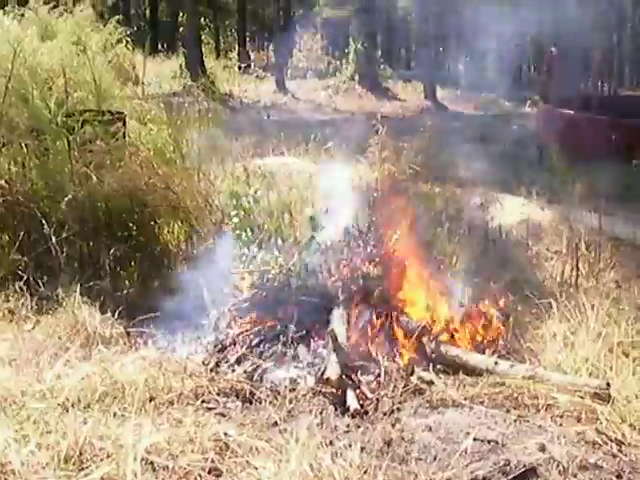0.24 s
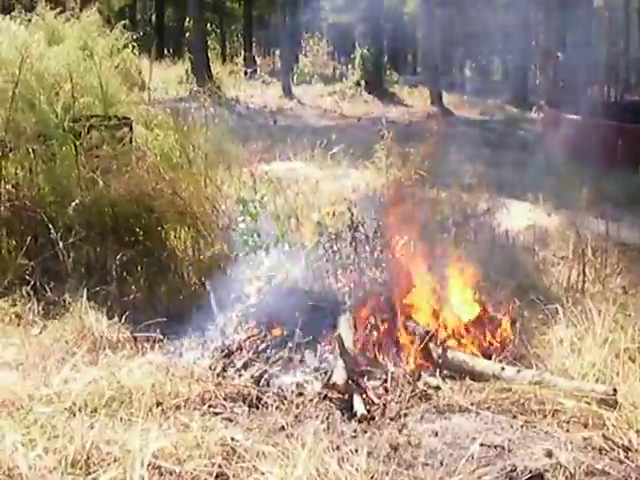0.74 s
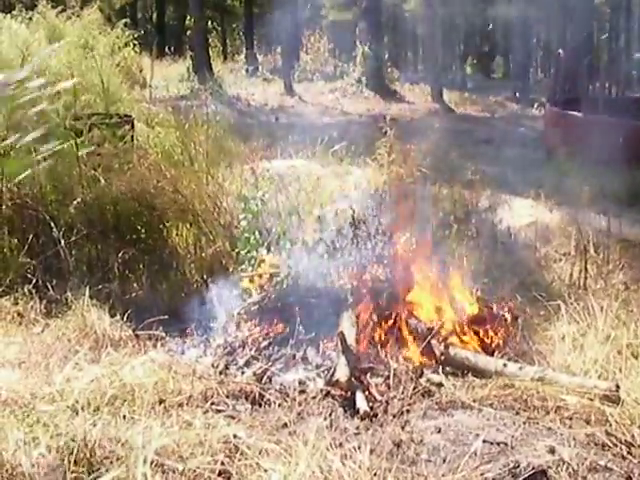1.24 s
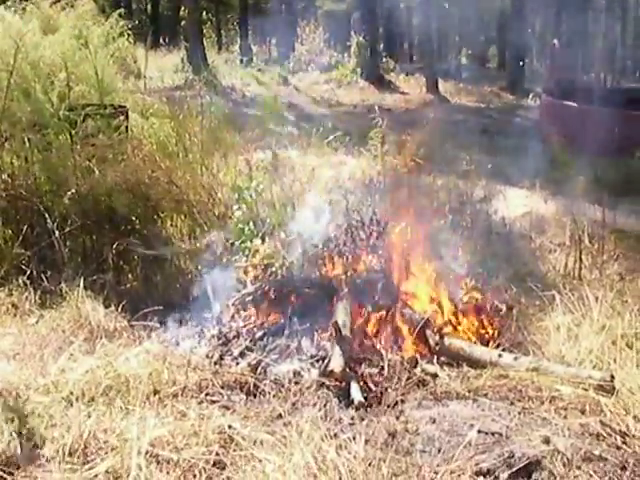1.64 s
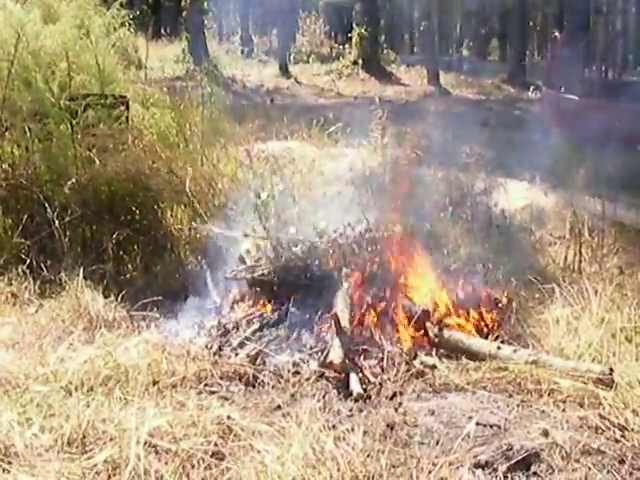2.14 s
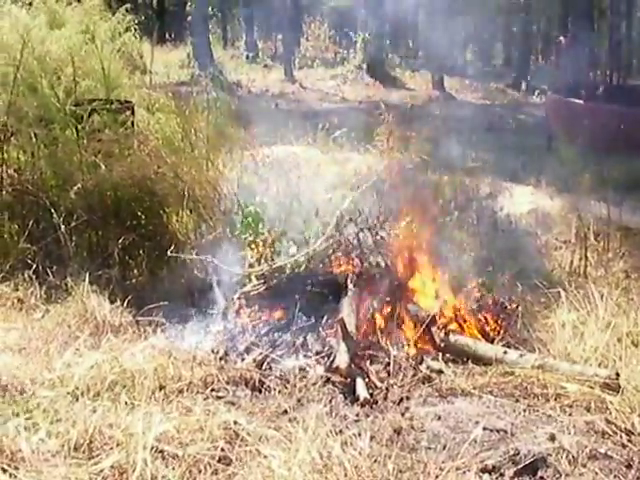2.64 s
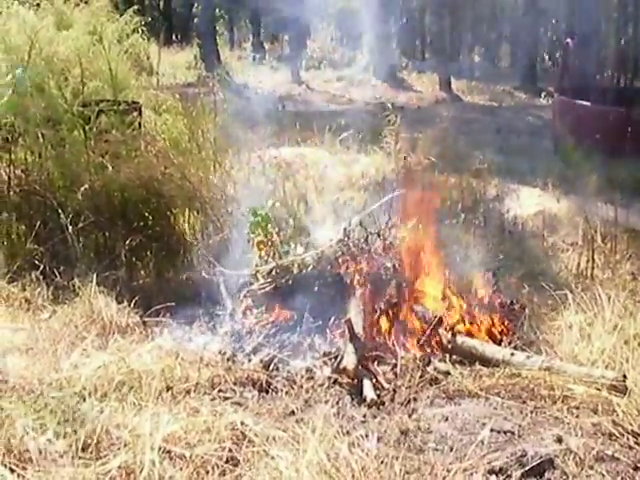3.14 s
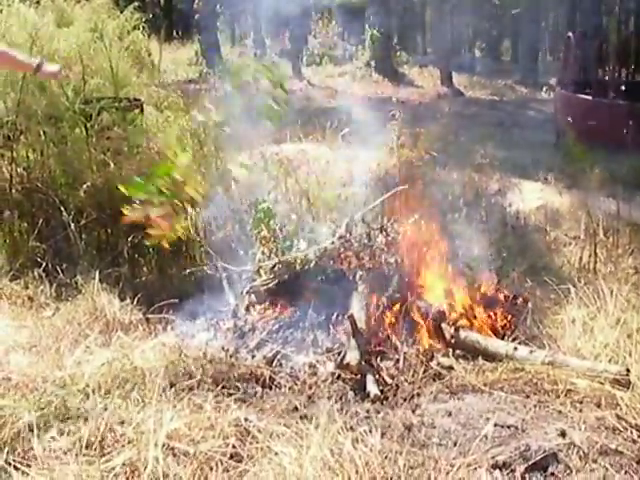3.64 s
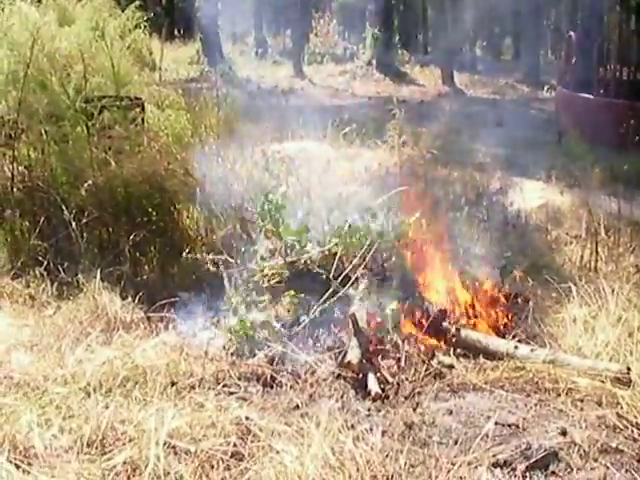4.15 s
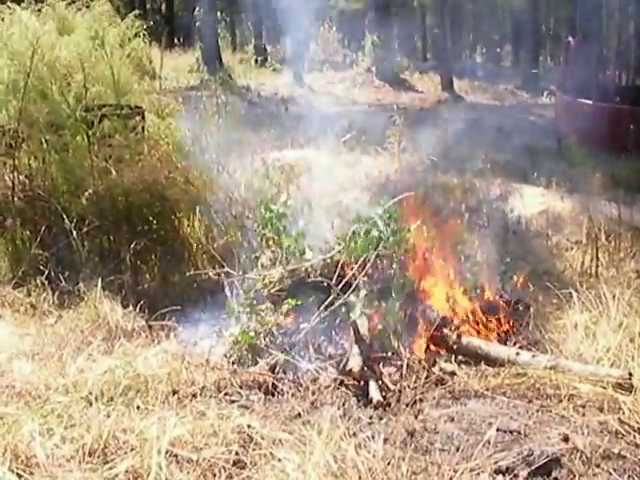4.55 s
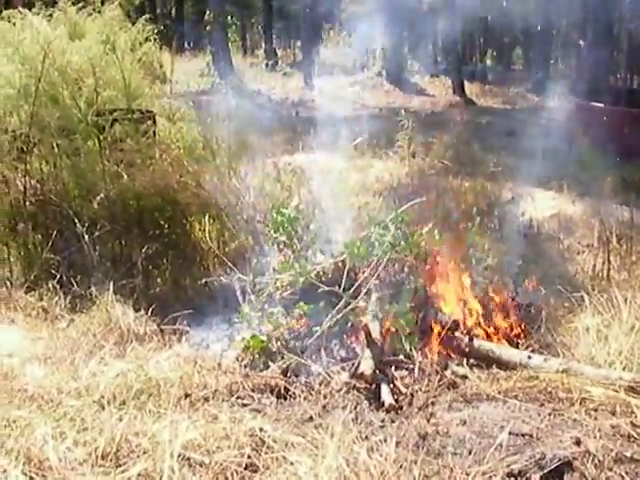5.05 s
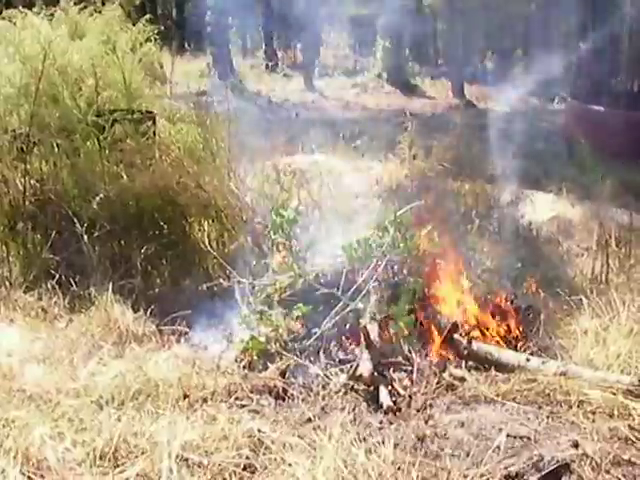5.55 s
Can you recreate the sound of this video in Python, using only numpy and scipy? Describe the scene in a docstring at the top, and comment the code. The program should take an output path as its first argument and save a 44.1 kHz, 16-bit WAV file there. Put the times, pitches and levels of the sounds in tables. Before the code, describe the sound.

A small fire of straw and twigs crackles densely outdoors, with sharp pops, hissing steam and a low rumble.

```python
"""Burning pine straw and twigs

A pile burns outdoors, a few steps away. Pockets of sap burst as short pops, over the crackle of
snapping needles and a hiss of steam that come in spurts. The flames rumble as they draw air, gas
gives soft thumps, and a light breeze pushes on the microphone. Two leafy branches land with a swish."""
import sys
import numpy as np
from scipy import signal
from scipy.fft import rfft, irfft, next_fast_len
from scipy.io import wavfile
from scipy.ndimage import uniform_filter1d, minimum_filter1d, map_coordinates

SR = 44100
rng = np.random.default_rng(int(sys.argv[2]) if len(sys.argv) > 2 else 0)


def put_to_file(sound):
    """Save the sound as 16-bit audio at rate SR, in the file named by the first command-line argument."""
    columns = np.atleast_2d(sound).T  # one column per channel
    safe = np.clip(columns, -1, 1)
    whole_steps = np.round(safe * 32767)
    wavfile.write(sys.argv[1], SR, whole_steps.astype(np.int16))


N = 255780

# Bursting sap pockets; levels in all tables are relative:
# (time [s], low thud [dB], ringing body [dB], bright spit [dB], body pitch [Hz])
SAP_POPS = [(0.0071, -33, -17, -11.5, 3260), (0.0287, -24.5, -16, -34, 4550),
            (0.0827, -24.5, -18, -10.5, 5140), (0.1198, -44, -22, -18, 4400), (0.133, -44, -12, -19, 4500),
            (0.153, -16.5, -8, -40, 3080), (0.2133, -47, -39, -18, 5200), (0.2356, -30, -28, -14, 3800),
            (0.273, -32, -25, -10.5, 3960), (0.2988, -41, -20, -24, 3970), (0.3052, -17.5, -7.5, -25, 4100),
            (0.414, -48, -22, -38, 6300), (0.4265, -26, -17, -16.5, 6600), (0.4606, -34, -21.5, -14, 5840),
            (0.4816, -29, -17, -37, 4500), (0.528, -37, -23, -18, 4300), (0.5354, -37, -21, -11, 5100),
            (0.5695, -25, -19, -12, 4800), (0.5774, -22, -17, -17, 5900), (0.59, -22.5, -7, -11, 3680),
            (0.6885, -29, -11, -26, 6200), (0.6909, -32, -19, -11, 6200), (0.6954, -33, -10, -16.5, 5460),
            (0.7037, -53, -20, -20, 6500), (0.7288, -25, -13.5, -17, 5500), (0.7749, -53, -15.5, -15, 6700),
            (0.8173, -35, -28, -14, 4300), (0.846, -43, -18, -7.5, 4730), (0.8566, -26, -16, -15, 6500),
            (0.905, -29, -20, -16, 5600), (0.921, -32, -16, -19, 5970), (0.9385, -31, -20, -11, 5430),
            (0.9826, -31, -19.5, -19, 5100), (0.998, -42, -35, -9, 5370), (1.0155, -40, -22, -16, 6200),
            (1.0262, -37, -21, -11, 3740), (1.0622, -23, -13, -15.5, 4300), (1.0653, -47, -11, -18, 5100),
            (1.0878, -48, -24, -15, 6100), (1.1289, -37, -19, -11.5, 4740), (1.1641, -33, -14, -12, 6560),
            (1.222, -25.5, -24, -13, 5900), (1.2896, -45, -23, -30, 4900), (1.3198, -26, -20, -25, 5400),
            (1.325, -47, -19, -16, 4500), (1.3344, -36, -12, -25, 4840), (1.3525, -24.5, -14, -4, 4670),
            (1.3658, -40, -18, -12, 6500), (1.4301, -30, -9, -22, 4370), (1.4664, -30, -25, -10.5, 4300),
            (1.4824, -39, -20, -13, 4500), (1.526, -25, -13, -18, 6300), (1.5796, -21, -7.5, -6.5, 6900),
            (1.6588, -45, -20, -23, 4900), (1.6664, -30, -17.5, -13, 5130), (1.7183, -43, -20, -17, 5270),
            (1.8117, -21.5, -18, -31, 4070), (1.8289, -25, -11.5, -22, 4350), (1.9348, -53, -28, -33, 4330),
            (1.9554, -54, -30, -27, 4600), (2.0114, -39, -14.5, -15, 4600), (2.0436, -36, -17, -32, 6200),
            (2.0562, -31, -19.5, -13.5, 5300), (2.0931, -23, -14, -35, 3100),
            (2.1074, -40, -10.5, -10.5, 2750), (2.1171, -42, -12.5, -22, 2930),
            (2.1811, -33, -16.5, -20, 5600), (2.22, -22.5, -9.5, -6.5, 5070),
            (2.2501, -43, -12.5, -6, 5230), (2.3022, -47, -22, -7.5, 5100), (2.3082, -47, -35, -15, 5900),
            (2.3327, -47, -31, -13, 5500), (2.3408, -37, -17, -9, 7000), (2.3626, -48, -37, -8, 6400),
            (2.3833, -30, -15, -11, 5060), (2.4348, -33, -17.5, -24, 2700), (2.456, -30, -21, -13.5, 4960),
            (2.4674, -25.5, -16, -18, 4600), (2.523, -47, -22.5, -11.5, 3600),
            (2.5672, -17, -8.5, -14, 4350), (2.581, -36, -16, -24, 2880), (2.6051, -42, -12.5, -15, 5670),
            (2.6986, -24.5, -13.5, -15.5, 5400), (2.7244, -20, -16, -18, 3750),
            (2.7553, -38, -21, -11.5, 6600), (2.778, -32, -26, -20, 6000), (2.862, -34, -13, -7.5, 4370),
            (2.866, -47, -20, -19, 5700), (2.9394, -28, -10.5, -36, 4440), (2.9466, -26, -12, -18, 4960),
            (3.001, -17.5, -10, -23, 5900), (3.0423, -37, -38, -10, 5400), (3.0664, -42, -23, -11, 6000),
            (3.1161, -56, -15, -28, 5160), (3.138, -41, -24, -35, 3540), (3.1552, -22, -12, -20, 5150),
            (3.1792, -21, -10.5, -38, 4700), (3.3521, -26, -18.5, -19.5, 5140),
            (3.3927, -21.5, -21, -22, 5100), (3.4056, -38, -28, -14, 3500),
            (3.4093, -20.5, -14.5, -15.5, 4050), (3.456, -21, -9.5, -10, 5030),
            (3.5318, -34, -19.5, -12.5, 5340), (3.6088, -27, -21.5, -10.5, 6350),
            (3.6187, -42, -16.5, -9, 6500), (3.631, -35, -26, -22, 6250), (3.6612, -32, -11.5, -17, 6800),
            (3.673, -45, -21, -28, 3120), (3.7065, -50, -16, -10.5, 4860), (3.722, -37, -36, -13, 6800),
            (3.7462, -31, -18, -16, 6600), (3.7494, -23, -14, -11, 6300), (3.7703, -22, -11, -9.5, 3340),
            (3.7927, -20.5, -8.5, -21, 5560), (3.8707, -19.5, -13.5, -19, 6200),
            (3.9407, -45, -20.5, -16, 3820), (3.9496, -42, -19, -11.5, 6500),
            (3.9693, -31, -13, -12.5, 5170), (4.0785, -51, -8, -25, 3800),
            (4.1957, -28.5, -14.5, -30, 4100), (4.2526, -18.5, -12.5, -20, 4400),
            (4.2795, -42, -10.5, -15, 5570), (4.2939, -28, -16.5, -53, 2300),
            (4.317, -11.5, -15.5, -14, 5900), (4.3845, -38, -19, -21, 4300), (4.3886, -42, -17, -12, 5040),
            (4.435, -20, -3.5, -17, 3530), (4.4784, -26, -19.5, -12, 6000), (4.5577, -46, -30, -18, 4740),
            (4.6476, -23.5, -14, -15, 5800), (4.6592, -54, -19, -28, 2740),
            (4.722, -20.5, -12.5, -17, 3900), (4.752, -56, -26, -18, 5600), (4.7658, -44, -21, -9, 5300),
            (4.7917, -50, -16, -14, 5540), (4.8028, -42, -14.5, -13, 4500), (4.8372, -20, -24, -18, 5340),
            (4.8688, -64, -19.5, -13, 4600), (4.8755, -46, -38, -15, 5000), (4.8963, -47, -19.5, -19, 5000),
            (4.915, -53, -23, -13, 4400), (4.9322, -26.5, -11, -27, 4640), (4.9494, -47, -12.5, -13, 4700),
            (4.9728, -43, -13, -24, 5000), (4.9852, -24.5, -8, -13, 5100), (4.9977, -51, -33, -19, 5000),
            (5.0345, -22.5, -13.5, -12.5, 6850), (5.0839, -26, -16.5, -19, 6340),
            (5.097, -15.5, -19, -29, 3900), (5.1303, -38, -19, -19, 5460), (5.1556, -33, -42, -20, 3400),
            (5.1627, -45, -16, -21, 6450), (5.1711, -30, -18.5, -9.5, 6040), (5.231, -47, -25, -18, 4600),
            (5.2388, -51, -30, -21, 6000), (5.253, -39, -23, -16, 4700), (5.2653, -20.5, -10, -20, 6260),
            (5.3109, -28, -20, -18, 2700), (5.349, -21.5, -13.5, -11.5, 5500),
            (5.3748, -33, -17, -22, 5200), (5.3825, -47, -24, -12, 5100), (5.4178, -31, -18.5, -12.5, 2600),
            (5.4643, -36, -29, -11, 4700), (5.4726, -41, -23, -18, 6800), (5.4888, -48, -20, -10.5, 6800),
            (5.513, -35, -17, -11, 5600), (5.5222, -39, -23, -18, 6000), (5.5297, -40, -18, -24, 5900),
            (5.574, -51, -22.5, -13, 3020), (5.5837, -43, -19, -15.5, 5600), (5.5923, -38, -23, -12, 5800),
            (5.6563, -42, -33, -12, 4300), (5.6633, -40, -15, -24, 4720), (5.7453, -59, -16, -13, 3400),
            (5.7834, -46, -19, -18, 4760)]
# The broad hiss of straw: (frequency [Hz], level [dB])
STRAW_TONE = [(240, -71), (400, -17), (711, -2.5), (1480, -6), (1740, -6.5), (2060, -1.5), (5010, 0.5),
              (7000, 1), (9100, -34), (15400, -120)]
# The thin, high hiss of steam: (frequency [Hz], level [dB])
STEAM_TONE = [(6000, -68), (7500, -22.5), (9500, -10), (12900, -2.5), (16000, -39)]


def amp(db):
    """Turn decibels into a number to multiply a sound by."""
    return 10 ** (np.asarray(db) / 20)


def unit(x):
    """Scale each sound to an average strength (rms) of 1."""
    return x / np.sqrt(np.mean(x ** 2, axis=-1, keepdims=True) + 1e-20)


def tone_gain(tone, hz):
    """Read a table of (frequency, level) as a gain at any frequency."""
    points_hz, db = np.transpose(tone)
    return amp(np.interp(np.log(hz + 1), np.log(points_hz + 1), db))


def curves(rows):
    """Join the timed points of a table with lines, one curve per level column."""
    times, *columns = np.transpose(rows)
    return [np.interp(np.arange(N) / SR, times, column) for column in columns]


def wobble(rate_hz):
    """A smooth curve through rate_hz random values a second."""
    return map_coordinates(rng.standard_normal(N // 20), [np.arange(N) * rate_hz / SR])


def filtered(x, response):
    """Turn each frequency of x up or down by response(hz)."""
    size = next_fast_len(N + 8192)
    return irfft(rfft(x, size) * response(np.fft.rfftfreq(size, 1 / SR)), size)[..., :N]


def hiss(tone, patchy_db):
    """Two separate noises that share louder and softer patches in time and pitch."""
    spectra = signal.stft(rng.standard_normal((2, N)), nperseg=256)[2]
    patches = uniform_filter1d(rng.standard_normal(spectra.shape[1:]), size=6, axis=0)
    patches = uniform_filter1d(patches, size=8, axis=1)
    pair = signal.istft(spectra * amp(patchy_db * patches / patches.std()), nperseg=256)[1][:, :N]
    return unit(filtered(pair, lambda hz: tone_gain(tone, hz)))


def pops(rows):
    """Each puff of gas thuds, rings the twig and spits. Gives mid (centre) and side (width) signals."""
    times, thud_db, body_db, spit_db, body_hz = np.transpose(rows)[:, :, None]
    size, lead = 512, 64  # samples in a pop, and before its peak
    t = (np.arange(size) - lead) / SR
    hz = np.fft.rfftfreq(size, 1 / SR)
    noise = rng.standard_normal((len(rows), 2, size + 2)).transpose(1, 0, 2)
    fall_s = .00032 * np.exp(.3 * noise[0, :, -1:])
    # a sharp crack, then faint echoes from ground and branches
    shape = np.where(t < 0, np.exp(t / .00017), np.exp(-t / fall_s) + amp(-13) * np.exp(-t / .0016))
    noise[0, :, lead] += 1.5  # the break itself is one click
    puff = rfft(noise[..., :size] * shape)
    octaves_squared = lambda centre_hz: np.log2((hz + 1) / centre_hz) ** 2
    thud = amp(-np.where(hz < 1550, 2.2, 9) * octaves_squared(2030))
    body = amp(-7 - 8.9 * octaves_squared(5720)) + 1 / (1 + ((hz - body_hz) / 850) ** 2)
    spit = tone_gain(STEAM_TONE, hz)
    part = lambda band, db: amp(db) * unit(irfft(puff * band * (hz < 13620), size))
    wave = part(thud, thud_db - 13) + part(body, body_db - 12.5) + part(spit, spit_db - 14)
    # most pops sound narrower than the hiss, above all those from straight ahead
    side_db = np.minimum(-7 + 6 * noise[0, :, -2:-1], 1.5)
    wave[1] *= amp(side_db)
    at = (np.rint(times * SR).astype(int) + np.arange(size)).ravel()
    return np.array([np.bincount(at, channel.ravel(), N + 2 * size)[lead:][:N] for channel in wave])


def flare(pop_db):
    """Extra decibels of sizzle around each pop; strong pops give more, up to a limit."""
    spread_s, most_db = .013, 3.2
    hits = np.bincount((np.array(SAP_POPS)[:, 0] * SR).astype(int), amp(pop_db), N)
    t = np.arange(-SR // 10, SR // 10 + 1) / SR
    nearby = np.abs(signal.fftconvolve(hits, np.exp(-(t / spread_s) ** 2 / 2), "same"))
    return np.minimum(20 * np.log10(1 + amp(12) * nearby), most_db)


def crackle(straw_db, steam_db, count, spread_db):
    """Many small needles snap at random; a few are much louder than most."""
    when, strength, body, spit, thud, pitch = rng.random((count, 6)).T
    at = (when * N).astype(int)
    extra_db = np.minimum(-spread_db * np.log(strength + 1e-9), 12.5)
    body_db = straw_db[at] + extra_db - 4 + 8 * (body - .5)
    spit_db = steam_db[at] + extra_db - 3 + 8 * (spit - .5)
    thud_db = body_db - 18 + 9 * thud
    return pops(np.c_[at / SR, thud_db, body_db, spit_db, 2500 + 4500 * pitch])


def sizzle():
    """Needles snap over hissing straw and steam, which flutter together and flare with the pops."""
    # Slow swells of the sizzle: (time [s], straw level [dB], steam level [dB])
    spurts = [(0.0, -36.5, -36), (0.1, -35, -37), (0.24, -35, -39), (0.52, -39, -37), (0.61, -33, -35.5),
              (0.92, -38, -32.5), (1.06, -39, -36), (1.34, -39, -38.5), (1.71, -35.5, -36),
              (2.05, -37, -37.5), (2.26, -34.5, -29), (2.39, -39.5, -32), (2.5, -39, -41),
              (2.78, -39, -38.5), (3.15, -35.5, -36.5), (3.63, -38.5, -39), (3.8, -33, -35),
              (3.97, -37, -35.5), (4.68, -37, -37), (4.8, -37, -35.5), (4.93, -38, -38), (5.17, -41.5, -41),
              (5.51, -36.5, -33), (5.8, -37, -31.5)]
    straw_db, steam_db = curves(spurts) + .8 * wobble(rate_hz=14)
    _, _, body_db, spit_db, _ = np.transpose(SAP_POPS)
    straw_db += flare(body_db)
    steam_db += flare(spit_db)
    flutter_db = 1.8 * wobble(rate_hz=110)
    straw = amp(straw_db - 4.5 + flutter_db) * hiss(STRAW_TONE, patchy_db=1.5)
    steam = amp(steam_db - 3.5 + flutter_db) * hiss(STEAM_TONE, patchy_db=1.0)
    return straw + steam + crackle(straw_db, steam_db, count=1500, spread_db=5.0)


def flames():
    """The flames draw in air with a low, nearly even rumble."""
    # Strength of the rumble: (time [s], level [dB])
    draught = [(0.0, -51), (0.29, -51.5), (0.56, -48), (1.26, -56), (1.95, -48), (2.45, -53), (3.13, -49.5),
               (4.85, -49), (4.93, -52), (5.8, -53)]
    # Its deep tone: (frequency [Hz], level [dB])
    flame_tone = [(15, -51), (25, -45), (114, -3.5), (233, -2), (289, -2.5), (380, -29), (490, -65),
                  (840, -120)]
    flutter_db = 1.2 * wobble(rate_hz=20)
    return amp(curves(draught)[0] + 5.5 + flutter_db) * hiss(flame_tone, patchy_db=1.65)


def breeze():
    """Swirling air pushes on the microphone's left and right openings, mostly in opposite directions."""
    # Gusts on the microphone: (time [s], level [dB])
    gusts = [(0.0, -62), (0.14, -46), (0.45, -70), (0.97, -51), (1.1, -61), (3.1, -56), (3.44, -61),
             (3.95, -45.5), (4.3, -44), (4.45, -62), (4.62, -46), (5.02, -60), (5.3, -52), (5.8, -60)]
    # Their very deep tone: (frequency [Hz], level [dB])
    gust_tone = [(15, -30), (35, 6), (90, 4), (200, -13), (330, -47), (500, -70)]
    gust_db = curves(gusts)[0] + 1.5 * wobble(rate_hz=9)
    alike, opposed = amp(gust_db) * hiss(gust_tone, patchy_db=0.5)
    return np.array([.4 * alike + opposed, .4 * alike - opposed])


def gas_thumps():
    """Gas thumps softly under some pops: the air pressure swings once or twice."""
    # Low thumps of gas: (time [s], level [dB], pitch [Hz])
    thumps = [(0.156, -25, 240), (0.303, -32, 207), (0.592, -37, 212), (0.846, -27.5, 213),
              (1.165, -30, 225), (1.576, -33, 184), (2.465, -51, 210), (2.68, -53, 72.4), (3.14, -28, 236),
              (3.411, -26, 165), (3.78, -29.5, 145), (4.049, -39, 75), (4.15, -35, 90.5),
              (4.72, -31.5, 181), (5.172, -34, 144)]
    sound = np.zeros(N + SR)
    t = np.arange(-SR // 40, SR // 20) / SR
    for time, db, hz in thumps:
        swell = np.exp(-np.abs(t) * hz / np.where(t < 0, .6, 1.3))
        start = round(time * SR) - SR // 40
        sound[start:start + len(t)] += amp(db) * swell * np.sin(2 * np.pi * hz * t)
    return sound[:N]


def branch_rustle():
    """Leaves swish as a branch settles on the pile."""
    # Leafy branches landing: (time [s], length [s], level [dB])
    landings = [(1.682, 0.094, -40), (3.838, 0.11, -33)]
    rise_s, fall_s = .011, .021
    t = np.arange(N) / SR
    swell = np.zeros(N)
    for start, length, db in landings:
        ramps = np.minimum((t - start) / rise_s, 1 + (start + length - t) / fall_s)
        swell += amp(db) * np.clip(ramps, 0, 1)
    flutter = amp(1.8 * wobble(rate_hz=90))
    return swell * flutter * (hiss(STRAW_TONE, patchy_db=2.0) + hiss(STEAM_TONE, patchy_db=2.2))


def scene():
    """The fire lies ahead; adding and subtracting the side signal spreads it left and right."""
    # How wide the fire sounds: (frequency [Hz], gain of the side signal [dB])
    width = [(60, -1), (99, -23), (160, -2.5), (270, -6.5), (440, 0.5), (720, -7.5), (1190, -6), (1950, -7),
             (3210, -11.5), (5270, -0.5), (8670, -2), (14200, -13)]
    mid, side = pops(SAP_POPS) + sizzle() + flames() + branch_rustle()
    side = filtered(side, lambda hz: tone_gain(width, hz))
    fire = np.array([mid + side, mid - side])
    fire += gas_thumps() * amp([[1.5], [-1.5]])  # a little to the left
    return fire * amp([[-.4], [.4]]) + breeze()


def record(dry):
    """The highest treble falls away steeply, peaks are rounded and the volume dips after loud pops."""
    notch_hz, edge_hz, top_hz = 7870, 13620, 14858
    limit_db, recover_db_per_s = -6, 108.5
    hold, react = int(.03 * SR), int(.015 * SR)
    # one narrow band of treble is swallowed
    notch = lambda hz, depth, width_hz: 1 - depth / (1 + ((hz - notch_hz) / width_hz) ** 2)
    # only a faint trace is heard above the edge
    faint_top = lambda hz: np.where(hz < edge_hz, 1, amp(-30 - .011 * (hz - edge_hz)))
    heard = filtered(dry, lambda hz: notch(hz, .77, 696) * notch(hz, .49, 136) * faint_top(hz))
    heard = heard / (1 + np.abs(heard) ** 3.5) ** (1 / 3.5)  # round off the peaks
    # automatic volume control: just after a loud peak it drops, holds, then climbs back
    peak_db = 20 * np.log10(np.abs(heard).max(0) + 1e-9)
    wanted_cut_db = 1.026 * np.maximum(peak_db - limit_db, 0)
    held_db = -minimum_filter1d(-wanted_cut_db, hold, origin=(hold - 1) // 2)
    climb_db = recover_db_per_s * np.arange(N) / SR
    cut_db = np.maximum.accumulate(held_db + climb_db) - climb_db
    cut_db = uniform_filter1d(np.pad(cut_db, (react, 0))[:N], react)
    return filtered(heard * amp(-cut_db), lambda hz: 1 / (1 + (hz / top_hz) ** 120))


dry = scene()
out = record(dry)
put_to_file(out)
```